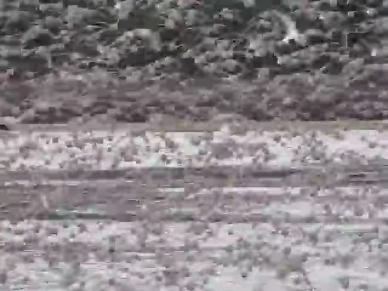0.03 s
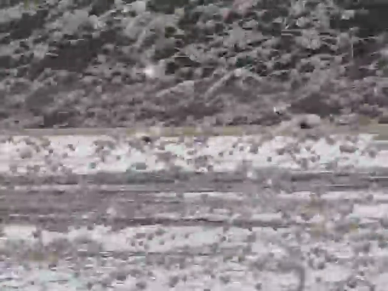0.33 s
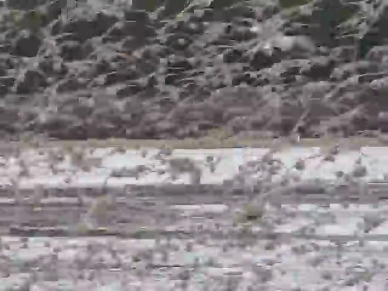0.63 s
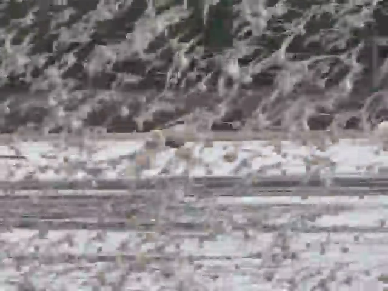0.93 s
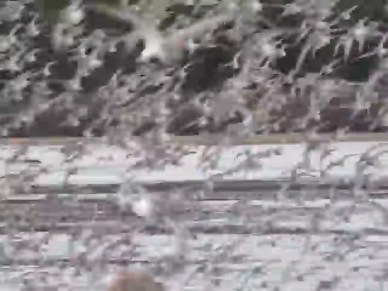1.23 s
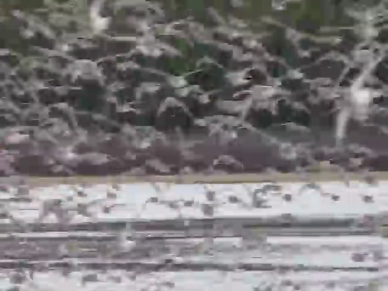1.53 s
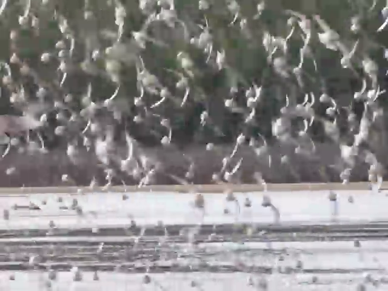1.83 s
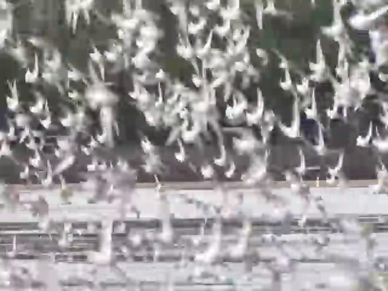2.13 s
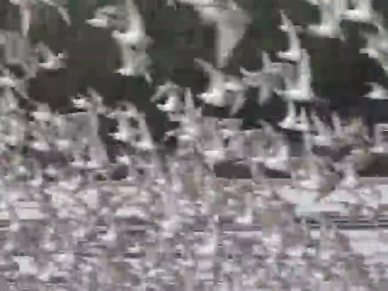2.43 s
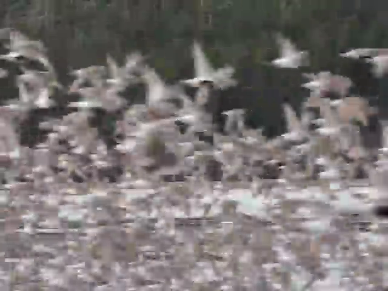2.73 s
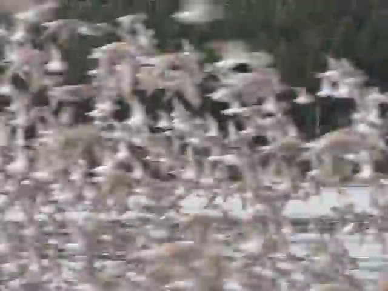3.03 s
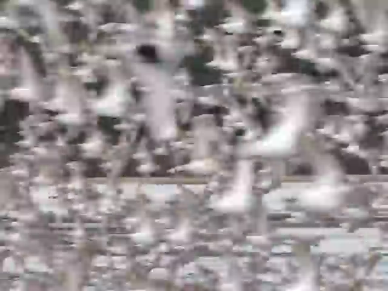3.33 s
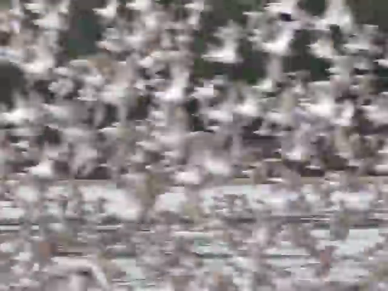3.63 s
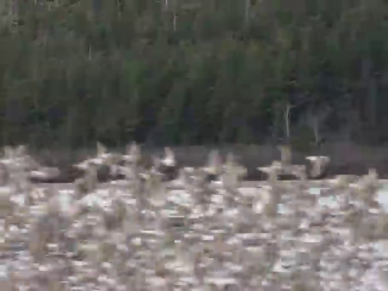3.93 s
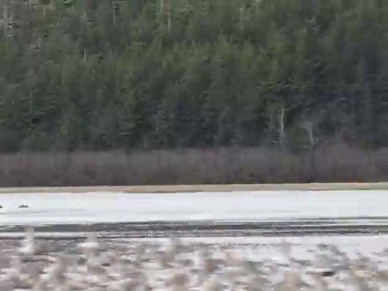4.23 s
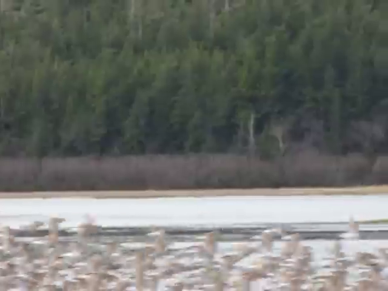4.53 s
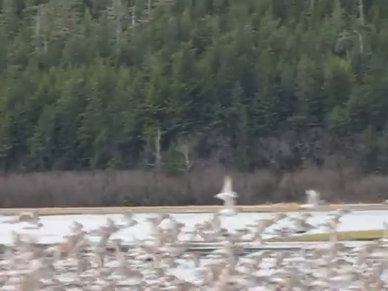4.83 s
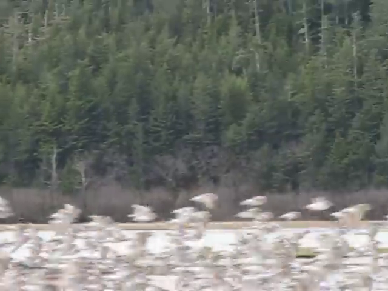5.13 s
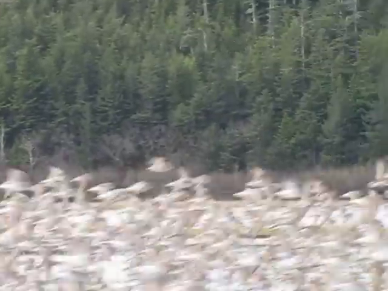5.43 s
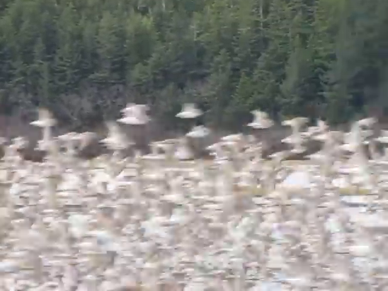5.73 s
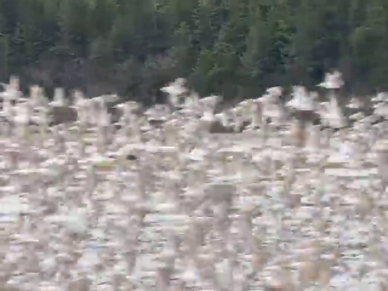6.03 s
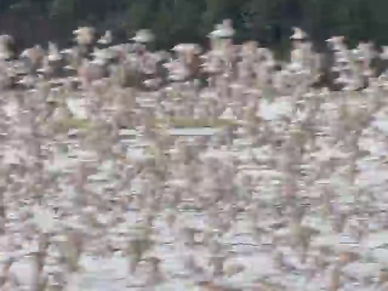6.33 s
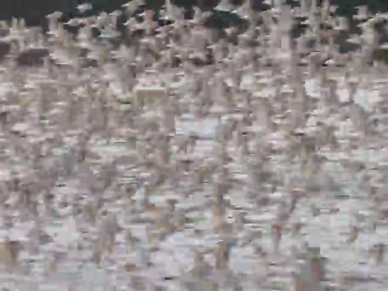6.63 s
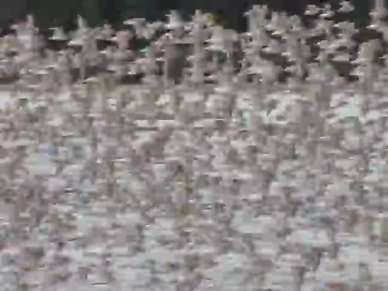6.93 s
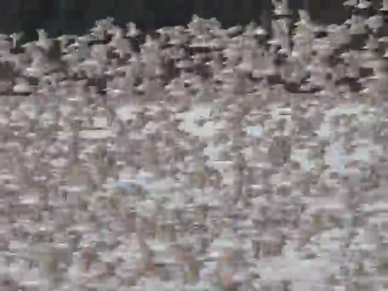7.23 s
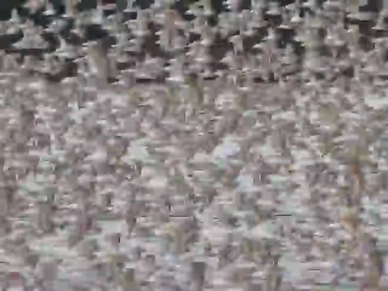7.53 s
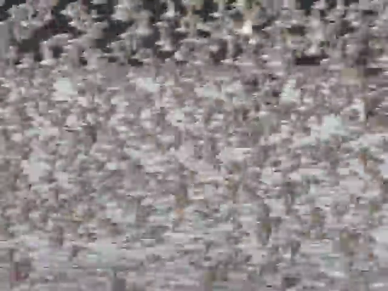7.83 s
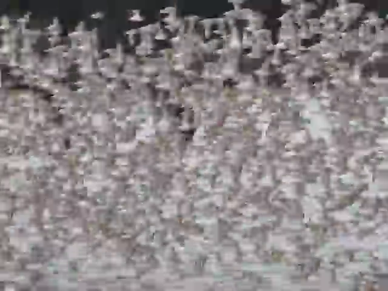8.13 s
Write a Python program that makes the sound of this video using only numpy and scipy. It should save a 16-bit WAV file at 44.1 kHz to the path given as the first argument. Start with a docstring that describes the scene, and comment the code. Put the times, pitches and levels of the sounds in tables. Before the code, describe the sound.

Thousands of shorebirds fly by in two waves, their wings merging into a rush under a high twittering chorus, with light wind buffeting.

```python
"""Shorebirds over a tidal flat

A huge flock of small birds wheels low, sweeping past in two great waves. Thousands of wing
strokes merge into a rush, and trills and peeps into a shrill chorus. A few near birds stand
out with calls and flaps, and there are thin squeals and one hollow tock.
Wind buffets the microphone, mostly on the left."""
import sys
import numpy as np
from scipy import signal
from scipy.fft import rfft, irfft, next_fast_len
from scipy.io import wavfile

SR = 44100
rng = np.random.default_rng(int(sys.argv[2]) if len(sys.argv) > 2 else 0)


def pcm_store(signal):
    """Save signal as 16-bit PCM."""
    levels = np.round(np.clip(np.atleast_2d(signal), -1, 1) * 32767)
    wavfile.write(sys.argv[1], SR, levels.astype(np.int16).T)


N = 361179
TIME = np.arange(N) / SR


def undb(db):
    """Turn decibels into a number to multiply a sound by."""
    return 10 ** (np.asarray(db) / 20)


def unit(x):
    """Scale a sound to an average strength (rms) of 1."""
    return x / np.sqrt(np.mean(x ** 2) + 1e-18)


def curves(table):
    """Join the rows of a table with straight lines in time, one curve per column."""
    times, *columns = np.transpose(table)
    return [np.interp(TIME, times, column) for column in columns]


def shape(x, gain):
    """Make each frequency in a sound stronger or weaker by gain(frequency)."""
    size = next_fast_len(x.shape[-1], real=True)
    hz = np.maximum(np.arange(size // 2 + 1) * SR / size, 1)
    return irfft(rfft(x, size) * gain(hz), size)[..., :x.shape[-1]]


def colour(x, points, power=1):
    """Change the tone along a curve of (frequency [Hz], level [dB]) points."""
    hz, db = np.transpose(points)
    return shape(x, lambda f: undb(power * np.interp(np.log(f), np.log(hz), db)))


def band(x, hz, octaves):
    """Keep a bell-shaped band of frequencies around hz."""
    return shape(x, lambda f: np.exp(-(np.log2(f / hz) / octaves) ** 2 / 2))


def walk(rate):
    """A random wobble, about 1 in size, that heads for a new value rate times a second."""
    return 1.2 * np.interp(TIME * rate, np.arange(8192), rng.standard_normal(8192))


def add(out, s, sound):
    """Mix a sound in, starting at s seconds."""
    part = out[..., max(int(s * SR), 0):][..., :sound.shape[-1]]
    part += sound[..., :part.shape[-1]]


def swell(length):
    """A rounded rise and fall lasting length seconds."""
    return unit(np.sin(np.linspace(0, np.pi, max(int(length * SR), 8))))


def pan(db):
    """Left and right gains that make the left side db decibels louder."""
    return undb(np.array([db, -db]) / 2)


def spread(pair, alike_hz=1150):
    """Make two unrelated noises one wide sound: low tones reach both sides alike, the right first."""
    likeness = lambda f: 0.2 + 0.84 / (1 + (f / alike_hz) ** 2)
    mid = shape(pair[0], lambda f: np.sqrt(1 + likeness(f)))
    side = shape(pair[1], lambda f: np.sqrt(np.clip(1 - likeness(f), 0, 1)))
    return unit(np.array([np.roll(mid + side, 4), mid - side]))


def echoes(x, fade_s, echo_db):
    """Sound bounces off the ground and the birds, leaving a short blurred tail on each side."""
    t = np.arange(SR // 4) / SR
    tail = rng.standard_normal((2, len(t))) * np.exp(-np.log(1000) * t / fade_s)
    tail /= np.sqrt(np.sum(tail ** 2, axis=1, keepdims=True))
    bounced = signal.oaconvolve(x, tail, axes=1)[:, :N]
    return (x + undb(echo_db) * bounced) / np.sqrt(1 + undb(2 * echo_db))


def nearness(s, width):
    """One over distance squared for something flying straight past, reaching 1 at time s."""
    return 1 / (1 + ((TIME - s) / width) ** 2)


def wheeling(s, width):
    """The share of a group that is calling: most while it wheels close, at time s."""
    return np.exp(-((TIME - s) / width) ** 2)


# Groups that sweep past. Each level is a starting point that its sound builds on.
# (time when nearest [s], half-width [s], wings [dB], trills [dB], peeps [dB], lean to the left [dB])
PASSING_GROUPS = [(2.05, 0.43, -49.5, -47, -39.5, -1.5), (2.5, 0.56, -46, -36, -35, -2.5),
                  (3.47, 0.22, -43.5, -67, -48, 1), (4.14, 0.55, -42, -35.5, -36.5, -1.5),
                  (5.1, 0.34, -52.5, -50, -45, -5.5), (7.45, 0.3, -66, -52.5, -54, 6)]
# The rest of the flock, farther out.
# (time [s], wings [dB], trills [dB], peeps [dB], lean to the left [dB])
DISTANT_FLOCK = [(0, -54.5, -46, -53.5, 0), (1.4, -64, -44.5, -50.5, 0.5), (5.6, -51, -51, -51, 0),
                 (6.6, -51.5, -51, -56.5, 5.5), (8.19, -53, -51.5, -55, 4.5)]


def flock(part, rise_and_fall, steepness, lead_s=0, crossing_db=2):
    """Level and leftward lean [dB] of the wings, trills or peeps: far birds plus passing groups."""
    column = ["wings", "trills", "peeps"].index(part)
    *far_db, far_pan_db = curves(DISTANT_FLOCK)
    power = undb(far_db[column]) ** 2
    lean = power * far_pan_db
    for s, width, *levels_db, pan_db in PASSING_GROUPS:
        group = undb(levels_db[column]) ** 2 * rise_and_fall(s - lead_s, width) ** steepness
        right_to_left = crossing_db * np.tanh((TIME - s) / width)
        power += group
        lean += group * (pan_db + right_to_left)
    return 10 * np.log10(power), lean / power


def strokes(length, scatter_db, birds):
    """Air noise pulsed by wings that each beat 10 to 15 times a second, no two strokes alike."""
    power = np.zeros(N)
    for pace, start in rng.random((birds, 2)):
        beats = (np.arange(140) + start) / (10 + 5 * pace)
        beats = beats[beats < TIME[-1]]
        power[(beats * SR).astype(int)] += undb(2 * scatter_db * rng.standard_normal(len(beats)))
    power = np.abs(signal.oaconvolve(power, swell(length) ** 2, "same"))
    return unit(np.sqrt(power)) * rng.standard_normal((2, N))


# The tone of the three parts of a wing stroke. (frequency [Hz], relative level [dB])
PUFF_TONE = [(25, -4), (60, 0), (130, 2), (250, 3), (380, 0), (560, -4.5), (4000, -29), (16000, -38)]
SWISH_TONE = [(250, -47), (500, -11.5), (720, -2), (1050, -5), (1400, -7), (2100, -5), (3500, -8),
              (16000, -39)]
FEATHER_TONE = [(2000, -5), (5000, 5.5), (6600, 0.5), (8800, -1), (11000, -8.5), (13500, -10.5),
                (16000, -17)]
# Treble that the air swallows once the flock has passed. (frequency [Hz], level change [dB])
TREBLE_LOSS = [(8000, -2.5), (11000, -5), (16000, -9)]


def wings(turn_s=3.93, turn_width_s=1.34):
    """Each stroke puffs air, swishes and rustles the feathers; the rush dulls as the flock leaves."""
    wings_db, _ = flock("wings", nearness, steepness=1.185, lead_s=0.021)
    leaving = np.tanh((TIME - turn_s) / turn_width_s)  # -1 coming, +1 going
    puff = spread(colour(strokes(0.019, scatter_db=1.5, birds=60), PUFF_TONE))
    puff *= undb(2.5 + 4 * leaving)  # air is pushed backward, so it is louder from behind
    swish = spread(colour(strokes(0.048, scatter_db=4.5, birds=160), SWISH_TONE)) * undb(5)
    hiss = spread(colour(strokes(0.004, scatter_db=5, birds=350), FEATHER_TONE))
    hiss *= undb(-4 - 3 * leaving)  # feathers are heard best from in front
    gone = np.clip(2 * leaving, 0, 1)
    return (puff + swish + (1 - gone) * hiss + gone * colour(hiss, TREBLE_LOSS)) * undb(wings_db)


def crowd(centre_hz, range_octaves, scatter_db, count, samples):
    """Many tiny notes at random times, each with its own pitch, distance and direction."""
    chance = np.clip(rng.standard_normal((count, 5)), -2.2, 2.2).astype(np.float32)
    pitch, glide, arch, near, direction = chance.T[..., None]
    starts = (np.arange(count) + 4 * rng.random(count)) % count * (N + samples) / count
    slots = (starts.astype(int)[:, None] + np.arange(samples)).ravel()
    u = np.linspace(-1, 1, samples, dtype=np.float32)  # from a note's start to its end
    hz = centre_hz * 2 ** (range_octaves * pitch)
    # most notes fall, with a small arch on the way
    bent_time = u - 0.04 * (glide + 0.4) * u ** 2 - 0.04 * (arch + 0.5) * u ** 3
    phase = np.pi * samples / SR * hz * bent_time
    envelope = undb(scatter_db * np.minimum(near, 1)) * (1 - u ** 2)
    left_lag = 2 * np.pi * hz * (4 + 4.5 * direction) / SR
    sides = (envelope * np.sin(p) for p in (phase - left_lag, phase))
    mixed = np.array([np.bincount(slots, notes.ravel(), N + 2 * samples) for notes in sides])
    return unit(mixed[:, samples:N + samples])


def chorus():
    """Low trills and high peeps shimmer; as the flock sweeps close, excited voices fill the gaps."""
    trills_db, trills_pan_db = flock("trills", wheeling, steepness=1.88)
    # high peeps carry forward, so they swell before the trills
    peeps_db, peeps_pan_db = flock("peeps", wheeling, steepness=1.88, lead_s=0.017)
    trills = crowd(2824, range_octaves=0.1744, scatter_db=-1, count=5500, samples=750)
    trills *= undb(trills_db + 1 + 0.5 * walk(10))
    peeps = crowd(4357, range_octaves=0.099, scatter_db=2.5, count=9000, samples=540)
    peeps *= undb(peeps_db + 2 + 0.5 * walk(13))
    excited = crowd(3393, range_octaves=0.161, scatter_db=2, count=8000, samples=450)
    excited *= undb(1.5 * trills_db + 19.5)
    shrill = crowd(5340, range_octaves=0.15, scatter_db=-1.5, count=13000, samples=180)
    shrill *= undb(1.19 * peeps_db - 1.5)
    return (trills + excited) * pan(trills_pan_db + 6) + (peeps + shrill) * pan(peeps_pan_db)


def chirp(length, start_hz, end_hz, rough_octaves, trill_hz, arch_octaves=0.032):
    """One whistled slide that bows up in the middle; an uneven trill shakes its pitch and strength."""
    envelope = swell(length)
    progress = np.linspace(0, 1, len(envelope))
    zigzag = rng.standard_normal(96) + (-1) ** np.arange(96)
    shake = np.interp(2 * trill_hz * length * progress, np.arange(96), zigzag)
    bend = arch_octaves * np.sin(np.pi * progress) + rough_octaves * shake
    hz = start_hz * (end_hz / start_hz) ** progress * 2 ** bend
    return envelope * (1 + 0.25 * shake) * np.sin(2 * np.pi * np.cumsum(hz) / SR)


def chatter(centre_hz, range_octaves, fall_octaves, scatter_db, count=460):
    """Rasping notes of 10 to 32 ms, mostly falling; those far from the usual pitch are weaker."""
    out = np.zeros((2, N))
    for k, (when, span, pitch, glide, near, direction) in enumerate(rng.uniform(-1, 1, (count, 6))):
        hz = centre_hz * 2 ** (range_octaves * pitch)
        fall = 2 ** (fall_octaves * (0.6 + glide) / 2)
        note = chirp(0.021 + 0.011 * span, hz * fall, hz / fall, rough_octaves=0.05, trill_hz=150)
        note *= undb(scatter_db * near - 6 * pitch ** 2)
        left = np.roll(note, int(4 + 6 * direction))
        add(out, (k + 2 * when) / count * TIME[-1], np.array([left, note]))
    return unit(out)


def stragglers():
    """Birds at the near edge of the flock, few enough for their rough notes to be heard one by one."""
    _, trills_db, peeps_db, pan_db = curves(DISTANT_FLOCK)
    trills = chatter(2870, range_octaves=0.26, fall_octaves=0.16, scatter_db=4) * undb(trills_db)
    peeps = chatter(4380, range_octaves=0.28, fall_octaves=0.26, scatter_db=4.5) * undb(peeps_db)
    voices = trills * pan(pan_db + 1.5) + peeps * pan(pan_db - 2.5)
    return echoes(voices, fade_s=0.08, echo_db=-5) * undb(-0.3)


# Thin, high squeals. (time [s], length [s], starting pitch [Hz], squeal level [dB], hiss level [dB])
THIN_SQUEALS = [(0, 0.44, 8750, -55, -50.3), (0.57, 0.48, 8150, -60.5, -61), (1.05, 0.34, 8450, -54, -59)]


def squeals(rise_octaves_per_s=0.27, fade_s=0.06):
    """Squeals creep up in pitch with a fast, uneven twitter, each above a narrow hiss."""
    out = np.zeros(N)
    waver = 1 + 0.016 * walk(45) + 0.022 * walk(300) + 0.021 * walk(2000)
    flicker_db = 2.6 * walk(50)
    hiss = unit(band(rng.standard_normal(N), hz=5700, octaves=0.19))
    for s, length, start_hz, squeal_db, hiss_db in THIN_SQUEALS:
        hz = start_hz * waver * 2 ** (rise_octaves_per_s * np.clip(TIME - s, 0, length))
        envelope = np.clip(np.minimum(TIME - s, s + length - TIME) / fade_s + 0.5, 0, 1)
        tone = undb(squeal_db + flicker_db) * np.sin(2 * np.pi * np.cumsum(hz) / SR)
        out += envelope * (tone + undb(hiss_db) * hiss)
    return out


# Calls of near birds. (time [s], length [s], starting pitch [Hz], end pitch [Hz], relative level [dB])
NEAR_CALLS = [(0.01, 0.069, 7200, 8700, -63), (0.526, 0.023, 3100, 3350, -46.5),
              (1.031, 0.13, 2850, 3140, -46), (1.104, 0.022, 4230, 3680, -43),
              (1.139, 0.025, 4870, 5550, -48), (1.257, 0.024, 5030, 4500, -45),
              (1.349, 0.027, 4050, 3760, -38.5), (1.524, 0.047, 1646, 1460, -46.5),
              (2.949, 0.043, 3040, 2970, -37), (3.108, 0.023, 5250, 5350, -45),
              (3.148, 0.019, 6100, 6200, -51), (3.306, 0.019, 3210, 3300, -37.5),
              (5.277, 0.025, 7350, 5900, -51), (5.645, 0.02, 5200, 4000, -52),
              (5.74, 0.034, 2930, 2490, -45), (5.785, 0.034, 4500, 3930, -44),
              (5.91, 0.04, 4920, 4430, -47), (6.116, 0.027, 3010, 2590, -42),
              (6.966, 0.021, 3070, 2670, -47), (7.289, 0.023, 5000, 4450, -51),
              (7.591, .04, 3040, 2700, -45), (7.896, 0.035, 3310, 2460, -48)]


def calls():
    """Single whistles stand out from the chorus; the wider the slide, the rougher the trill."""
    out = np.zeros(N)
    for s, length, start_hz, end_hz, db in NEAR_CALLS:
        rough_octaves = 0.024 + 0.14 * abs(np.log2(end_hz / start_hz))
        add(out, s, undb(db + 3.5) * chirp(length, start_hz, end_hz, rough_octaves, trill_hz=160))
    return out


# The tone of wind on the microphone. (frequency [Hz], relative level [dB])
WIND_TONE = [(15, -8), (40, -1), (90, 2), (140, -1.5), (220, -10), (350, -23), (600, -45), (6000, -95)]
# Gusts. (time of the peak [s], half-width [s], relative level [dB])
WIND_GUSTS = [(.1, .2, -52.5), (.58, 0.17, -43), (1.07, 0.21, -41), (5.85, 0.28, -40), (6.85, 0.16, -42),
              (7.55, 0.38, -38.5), (7.92, 0.21, -30)]
# Small swirls of air that hit the microphone. (time [s], length [s], level on the left [dB])
WIND_SWIRLS = [(0.451, 0.026, -34), (.49, 0.025, -38), (0.54, 0.02, -26.5), (0.567, 0.045, -35),
               (0.627, 0.032, -41.5), (0.827, 0.013, -36), (0.906, 0.035, -28), (0.991, 0.081, -36.5),
               (1.057, 0.029, -32.5), (1.152, 0.022, -35), (1.186, 0.039, -24.5), (1.224, 0.027, -23.5),
               (5.446, 0.053, -27.5), (5.483, 0.058, -26), (5.528, 0.072, -31.5), (5.721, 0.019, -30),
               (6.693, 0.037, -36), (7.29, 0.024, -33), (7.364, 0.01, -20.5), (7.43, 0.091, -37),
               (7.666, 0.033, -24.5), (7.958, 0.085, -29.5)]


def wind(calm_db=-60, steepness=1.46, shelter_db=-23.5):
    """Churning air rumbles on the left, less on the sheltered right; swirls add brighter thumps."""
    gusts = sum(undb(db) ** 2 * nearness(s, width) ** steepness for s, width, db in WIND_GUSTS)
    breeze_db = 10 * np.log10(undb(calm_db) ** 2 + gusts)
    rumble = unit(colour(rng.standard_normal((2, N)), WIND_TONE))
    rumble *= undb(breeze_db + 2 + 2.05 * walk(35))
    swirl = shape(colour(rng.standard_normal((2, N)), WIND_TONE), lambda f: f / (f + 160))
    for s, length, db in WIND_SWIRLS:
        envelope = swell(length)
        thump = np.array([unit(envelope * side[int(s * SR):][:len(envelope)]) for side in swirl])
        add(rumble, s, undb(db) * thump)
    left, right = rumble
    return np.array([left, undb(shelter_db) * right])


# Single wing snaps close by. (time [s], length [s], centre frequency [Hz], level [dB])
WING_SNAPS = [(1.05, 0.049, 1080, -45.5), (1.322, 0.02, 840, -44.5), (1.43, 0.0018, 1004, -32.5),
              (1.432, 0.036, 640, -43.5), (2.184, 0.0091, 840, -37), (3.316, 0.023, 1040, -41),
              (3.385, 0.033, 940, -46), (5.24, 0.0061, 7940, -51.5), (6.554, 0.0053, 7000, -51)]


def flaps(width_octaves=0.21, widening_octaves_per_s=16):
    """A wing on the left snaps out a short burst of air; longer strokes are broader in tone."""
    out = np.zeros(N)
    for s, length, hz, db in WING_SNAPS:
        air = band(rng.standard_normal(4096), hz, width_octaves + widening_octaves_per_s * length)
        envelope = swell(length)
        add(out, s, undb(db) * unit(envelope * air[:len(envelope)]))
    return np.array([np.roll(out, 2), out]) * pan(9.3)[:, None]


# The tones that the tock rings with. (pitch [Hz], level [dB])
TOCK_TONES = [(1075, -23.5), (1490, -25)]


def tock(start_s=2.3238, length_s=0.0073):
    """One short, hollow tock close by on the left, with a faint tail."""
    envelope = swell(length_s)
    t = TIME[:len(envelope)]
    ring = sum(undb(db) * np.sin(2 * np.pi * hz * t) for hz, db in TOCK_TONES)
    out = np.zeros((2, N))
    add(out, start_s, envelope * ring)
    return echoes(out, fade_s=0.05, echo_db=-13) * pan(8)[:, None]


# Harsh falling calls. (time [s], length [s], starting pitch [Hz], end pitch [Hz], level [dB])
HARSH_CALLS = [(6.762, .135, 4950, 3650, -46.5), (6.81, .11, 3250, 2750, -47.5)]


def buzzes(pulse_hz=85, sweep_octaves=0.38):
    """Each harsh call is a run of uneven pulses, and each pulse a quick, rasping downward sweep."""
    out = np.zeros(N)
    for s, length, start_hz, end_hz, db in HARSH_CALLS:
        envelope = np.sqrt(np.abs(swell(length)))
        n = len(envelope)
        cycle = np.cumsum(pulse_hz * (1 + 0.2 * walk(60)[:n])) / SR % 1  # 0 to 1 in each pulse
        bend = sweep_octaves * (0.5 - cycle) + 0.04 * walk(1500)[:n]
        hz = np.geomspace(start_hz, end_hz, n) * 2 ** bend
        pulses = np.sin(np.pi * cycle) ** 2 * np.sin(2 * np.pi * np.cumsum(hz) / SR)
        add(out, s, undb(db) * unit(envelope * pulses))
    return out


def near_birds():
    """Squeals, calls and buzzes reach the right side just before the left, with a short echo."""
    voices = squeals() + calls() + buzzes()
    return echoes(np.array([np.roll(voices, 2), voices]), fade_s=0.1, echo_db=-3)


# The microphone's right side is brighter than its left. (frequency [Hz], left minus right [dB])
SIDE_BALANCE = [(200, 1), (1300, 0.6), (2400, 0.5), (3200, -4.5), (4400, -5), (8000, -4.5), (15000, -4)]


def scene():
    """The birds as the two sides of the microphone hear them, plus the tock and the wind."""
    left, right = wings() + chorus() + stragglers() + near_birds()
    birds = np.array([colour(left, SIDE_BALANCE, power=0.5), colour(right, SIDE_BALANCE, power=-0.5)])
    return birds + flaps() + tock() + wind()


def record(dry, top_hz=15750):
    """Cut away the very highest treble."""
    return signal.sosfilt(signal.ellip(10, 0.1, 80, top_hz, fs=SR, output="sos"), dry)


dry = scene()
out = record(dry)
pcm_store(out)
```